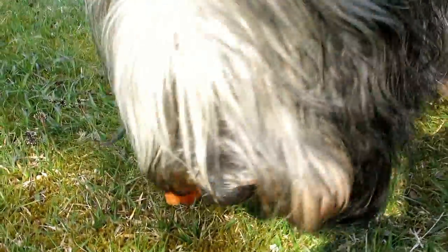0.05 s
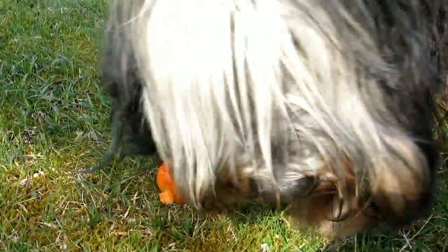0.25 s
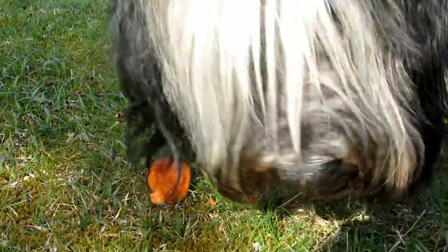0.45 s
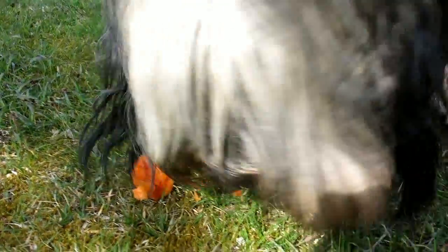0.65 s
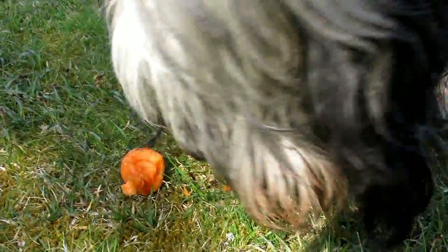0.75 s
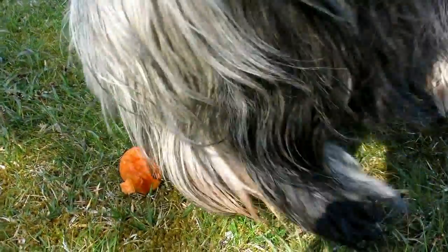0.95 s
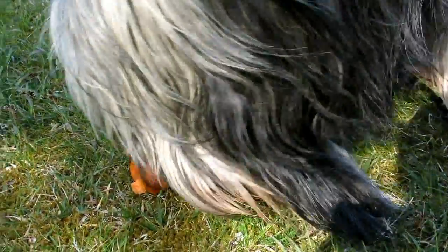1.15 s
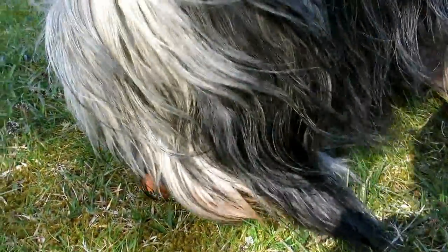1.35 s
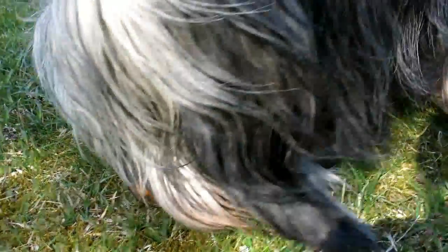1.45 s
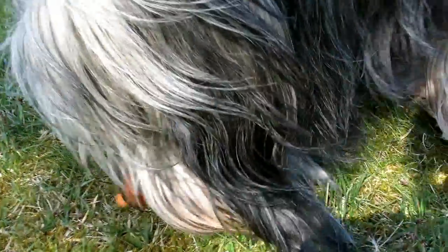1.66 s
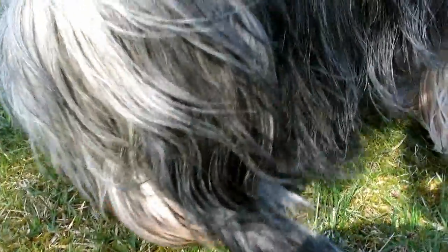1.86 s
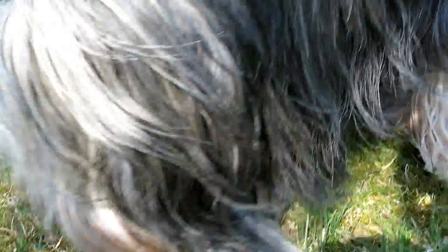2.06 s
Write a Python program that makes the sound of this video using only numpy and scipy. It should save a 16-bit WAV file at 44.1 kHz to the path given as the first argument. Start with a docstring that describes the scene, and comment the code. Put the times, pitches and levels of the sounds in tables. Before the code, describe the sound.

A dog crunches a raw carrot very close to the microphone outdoors. From 0.05 to 0.95 s, dense brittle cracks, tooth knocks, squelches and low jaw thuds, strongest around 0.5, 0.67 and 0.84. Wet smacks follow near 1.0 and 1.2, a duller crunch at 1.3, then fur swishing through grass around 1.5 to 1.7. Birds chirp at 0.4, 1.1 and 1.8, with falling whistles at 1.5 and 1.64.

```python
"""A shaggy dog bites a raw carrot close by, over a soft outdoor hush, a low rub and a fine rustle that last throughout.
Jaw thuds are brief low tones; pulp squelches in small pops; tooth knocks and lip smacks ring briefly.
The carrot splits in runs of tiny fractures that ring in the mouth and in the breaking flesh.
Farther off, birds chirp and whistle as gliding tones with diffuse tails.
Grass ticks and fur swishes are shaped noise and random clicks."""
import sys
import numpy as np
from scipy import signal
from scipy.fft import rfft, irfft
from scipy.io import wavfile
from scipy.ndimage import uniform_filter1d

SR = 44100
rng = np.random.default_rng(int(sys.argv[2]) if len(sys.argv) > 2 else 0)


def wav_record(signal):
    """Record a signal, one row per channel, as 16-bit PCM in the file named by sys.argv[1]."""
    frames = np.transpose(np.atleast_2d(signal))
    bounded = np.clip(frames, -1, 1)
    # unit amplitude maps onto the largest positive 16-bit level
    quanta = np.round(bounded * 32767).astype(np.int16)
    wavfile.write(sys.argv[1], SR, quanta)


N = 92610  # samples in the scene
SPAN_S = 0.008  # short sounds take their level as the rms (average strength) over this span


def from_db(db):
    """Turn decibels into a gain."""
    return 10 ** (np.asarray(db) / 20)


def span_gain(db):
    """Gain that brings a sound of energy 1 to this rms level over the short span."""
    return from_db(db) * np.sqrt(SPAN_S * SR)


def rms_one(x):
    """Scale to rms 1."""
    return x / np.sqrt(np.mean(x ** 2) + 1e-20)


def unit_energy(x):
    """Scale each channel to energy 1."""
    return x / np.sqrt(np.sum(x ** 2, axis=-1, keepdims=True) + 1e-20)


def curve(rows, t):
    """Join table rows by straight lines in time."""
    s, *columns = np.transpose(rows)
    return [np.interp(t, s, column) for column in columns]


def at_hz(points, hz):
    """Read a spectrum table along a logarithmic pitch axis."""
    f, value = np.transpose(points)
    return np.interp(np.log(hz + 1), np.log(f), value)


def add(out, s, sound):
    """Mix a sound in, starting at a given second."""
    i = int(np.clip(s * SR, 0, N - 1))
    out[..., i:i + sound.shape[-1]] += sound[..., :N - i]


def resonate(x, modes):
    """Ring side-by-side resonances (f/Hz, width/Hz, level/dB), flipping the sign of every second one."""
    out = 0
    for k, (hz, width, db) in enumerate(modes):
        r = np.exp(-np.pi * width / SR)  # a wider resonance dies sooner
        gain = (-1) ** k * from_db(db) * (1 - r * r) / 2
        feedback = [1, -2 * r * np.cos(2 * np.pi * hz / SR), r * r]
        out = out + gain * signal.lfilter([1, 0, -1], feedback, x)
    return out


def band(x, low_hz, high_hz):
    """Keep the sound between two pitches."""
    return signal.sosfilt(signal.butter(2, [low_hz, high_hz], "band", fs=SR, output="sos"), x)


def smooth_noise(shape, seconds):
    """Slowly wandering noise of rms 1: a running average over the given time."""
    return rms_one(uniform_filter1d(rng.standard_normal(shape), int(seconds * SR)))


# how alike left and right are at each pitch: (f/Hz, likeness from 0 to 1)
LIKENESS = [(60, 1), (150, 0.99), (300, 0.93), (700, 0.05), (2000, 0.12), (5000, 0.23), (14000, 0.05)]


def coloured(pair, colour):
    """Two unrelated signals become stereo with a given spectrum, at rms 1."""
    hz = np.arange(N // 2 + 1) * SR / N
    mid, side = rfft(pair) * from_db(at_hz(colour, hz))
    alike = np.clip(at_hz(LIKENESS, hz), -1, 1)
    shared = np.sqrt(1 + alike) * mid
    opposed = np.sqrt(1 - alike) * side * [[1], [-1]]
    return rms_one(irfft(shared + opposed, N))


def scatter(x, t60):
    """Diffuse reflections, different in each ear, that fall by 60 dB in t60 seconds."""
    t = np.arange(int(t60 * SR)) / SR
    tail = unit_energy(rng.standard_normal((2, len(t))) * from_db(-60 * t / t60))
    return signal.fftconvolve(x, tail, axes=-1)[:, :N]


PORT_LAG_S, PORT_CORNER_HZ = 0.000092, 3170  # the lag shrinks at higher pitches, halved at the corner
# colour of the right microphone port: (f/Hz, level/dB)
RIGHT_PORT = [(300, -0.5), (5000, -1), (9500, 2.5), (13000, -3.5)]


def ports(x):
    """The sound reaches the right microphone port a little later and slightly coloured."""
    hz = np.arange(N // 2 + 1) * SR / N
    lag = np.exp(-2j * np.pi * PORT_LAG_S * hz / (1 + hz / PORT_CORNER_HZ))
    right = rfft(x[1]) * from_db(at_hz(RIGHT_PORT, hz)) * lag
    return np.array([x[0], irfft(right, N)])


HUSH_DB = -47.5  # overall rms
# relative colour of the outdoor hush: (f/Hz, level/dB per Hz)
HUSH = [(18, -56), (30, -52), (69, 8), (108, -6.5), (177, -4.5), (369, -20), (639, -8.5), (767, -12),
        (970, -8.5), (2990, -25), (5040, -27), (12300, -33.5), (15500, -57)]


def hush():
    """Steady noise with the soft colour of outdoors."""
    return from_db(HUSH_DB) * coloured(rng.standard_normal((2, N)), HUSH)


RUSTLE_DB = 2  # added to every rustle level
GRAINS_PER_S, GRAIN_SPREAD_DB = 2600, -0.5
CLUMP_DB, CLUMP_S = 3.5, 0.0072
# fine crumbling of pulp and crackle of grass: (t/s, level/dB)
RUSTLE = [(0, -43), (.04, -55.5), (.08, -44), (.17, -51.5), (.22, -44), (.28, -38.5), (.34, -52),
          (.45, -45.5), (.49, -51), (.53, -41.5), (.62, -52.5), (.68, -47), (.77, -56), (.84, -42),
          (.91, -57), (.98, -45.5), (1.05, -57), (1.12, -46), (1.27, -61), (1.33, -48.5), (1.42, -65),
          (1.5, -52), (1.6, -54), (1.7, -56), (1.78, -55), (2.1, -62.5)]
# its relative colour: (f/Hz, level/dB)
RUSTLE_COLOUR = [(300, -5), (600, 3), (800, -6.5), (1150, 4), (2100, 0.5), (3200, -6.5), (4600, -6),
                 (7000, -13), (10500, -15.5), (15500, -17)]


def rustle():
    """Dense tiny clicks of uneven size, coming in clumps."""
    db, = curve(RUSTLE, np.arange(N) / SR)
    clump_db = CLUMP_DB * np.clip(smooth_noise(N, CLUMP_S), -2, 2)
    size_db = GRAIN_SPREAD_DB * np.minimum(rng.exponential(1, N), 2)
    grains = (rng.random(N) < GRAINS_PER_S / SR) * from_db(size_db + clump_db)
    clicks = grains * rng.uniform(-1.15, 1, (2, N))
    return from_db(db + RUSTLE_DB) * coloured(clicks, RUSTLE_COLOUR)


RUB_DB = 1.5  # added to every rub level
# dull rubbing of the muzzle over the ground: (t/s, level/dB)
RUB = [(0.0, -53), (0.05, -43), (0.47, -36.5), (0.5, -45), (0.73, -52), (0.84, -28.5), (0.93, -43),
       (1.09, -40.5), (1.13, -52), (1.37, -41.5), (1.63, -58), (1.69, -38.5), (1.77, -65.5), (1.84, -33.5),
       (1.89, -50.5), (2.1, -48)]
# its relative colour: (f/Hz, level/dB)
RUB_COLOUR = [(30, -36), (50, -44), (75, -2.5), (110, 6.5), (170, -8), (300, -7.5), (500, -14),
              (900, -42.5)]


def rubbing():
    """Low rumble, noise that swells and sinks as the muzzle moves about."""
    db, = curve(RUB, np.arange(N) / SR)
    return from_db(db + RUB_DB) * coloured(rng.standard_normal((2, N)), RUB_COLOUR)


THUD_DB, THUD_CYCLES = 1, 0.56  # added to every thud level; half length in cycles
# dull thuds of jaw and muzzle: (t/s, level/dB, f/Hz)
THUDS = [(0.056, -31, 133), (0.16, -26, 150), (0.176, -21.5, 115), (0.199, -29, 97), (0.225, -22.5, 187),
         (0.254, -26.5, 120), (0.286, -25.5, 124), (0.304, -29, 116), (0.323, -26, 200), (0.339, -32, 129),
         (0.371, -23, 108), (0.394, -25, 115), (0.408, -20, 160), (0.433, -27, 142), (0.454, -19.5, 132),
         (0.465, -21, 218), (0.489, -27, 145), (0.534, -28.5, 154), (0.565, -32, 191), (0.654, -22.5, 240),
         (0.781, -28.5, 188), (0.793, -20, 171), (0.806, -20, 187), (0.823, -22.5, 208), (0.838, -16, 151),
         (0.855, -25, 134), (0.882, -22, 225), (0.892, -23, 145), (0.953, -28.5, 170), (0.989, -28.5, 167),
         (1.043, -18, 171), (1.086, -21.5, 164), (1.185, -30.5, 134), (1.266, -32, 100), (1.29, -28.5, 140),
         (1.348, -27, 145), (1.368, -24.5, 161.4), (1.458, -24.5, 142), (1.501, -31, 198),
         (1.689, -24, 139.5), (1.831, -23.5, 132), (1.839, -24, 139), (1.85, -23.5, 124),
         (2.032, -29.5, 116)]


def thuds():
    """Each soft contact swells and dies within about two cycles."""
    out, t = np.zeros(N), np.arange(-1024, 1024) / SR
    for s, db, hz in THUDS:
        swell = np.exp(-(t * hz / THUD_CYCLES) ** 2)
        add(out, s + t[0], from_db(db + THUD_DB) * swell * np.sin(2 * np.pi * hz * t))
    return out


SQUELCH_POPS_PER_S, SQUELCH_WIDTH = 1100, 0.31  # width as a share of the pitch
# soft pulp is mashed between the teeth: (middle t/s, level/dB, half length/s, cavity f/Hz)
SQUELCHES = [(0.083, -43.5, 0.027, 426), (0.304, -46.5, 0.018, 536), (0.46, -41.5, 0.0083, 655),
             (1.118, -41.5, 0.0094, 1510), (1.333, -56, 0.011, 660), (1.678, -43, 0.0092, 900)]


def squelches():
    """Swells of small wet pops that ring in the cheek's cavity."""
    out, t = np.zeros(N), np.arange(N) / SR
    for s, db, half, hz in SQUELCHES:
        pops = (rng.random(N) < SQUELCH_POPS_PER_S / SR) * rng.uniform(-1.3, 1, N)
        cavity = band(resonate(pops, [(hz, SQUELCH_WIDTH * hz, 0)]), hz / 2, hz * 2)
        out += from_db(db) * np.exp(-((t - s) / half) ** 2) * rms_one(cavity)
    return out


KNOCK_DB, KNOCK_WIDTH = 1, 0.72  # added to every knock level; width as a share of the pitch
# teeth knock through the pulp, each a single hard pulse: (t/s, level/dB, f/Hz)
KNOCKS = [(0.0636, -48.5, 905), (0.074, -41.5, 650), (0.078, -46.5, 610), (0.1113, -44.5, 790),
          (0.2403, -37.5, 1020), (0.2965, -42, 450), (0.3172, -45, 475), (0.4595, -36.5, 740),
          (1.315, -54, 726), (1.3199, -35.5, 400), (1.3257, -45, 610), (1.344, -43, 600),
          (1.3596, -45, 436), (1.515, -48.5, 380)]


def knocks():
    """A tooth breaks through and stops: one sharp front, damped within a cycle or two."""
    out, click = np.zeros(N), signal.unit_impulse(1024)
    for s, db, hz in KNOCKS:
        pulse = resonate(click, [(hz, KNOCK_WIDTH * hz, 0)])
        add(out, s, span_gain(db + KNOCK_DB) * unit_energy(band(pulse, 180, 1670)))
    return out


FRACTURES_PER_S, FRACTURE_SIZE, FRACTURE_SPREAD_DB = 1800, 0.5, 4.5
BUILD_SHARE, BUILD_DB = 1.4, -11  # build-up time as a multiple of the crack's length, and its level
MOUTH_LEAK_DB, FLESH_SPREAD = -14, 0.11  # click that bypasses the mouth's ring; pitch spread between pieces
SNAP_DB, SIZZLE_DB = -6.5, 0.5  # added to every snap and sizzle level
# the carrot cracks: (t/s, mouth ring level/dB, snap level/dB, sizzle level/dB, mouth f/Hz,
# length/s, treble tilt to the left/dB)
CRACKS = [(0.075, -59, -40, -55, 1350, 0.00089, -1), (0.086, -42, -40.5, -51.5, 800, 0.0024, -4),
          (0.109, -37, -48, -67, 1710, 0.0032, -3), (0.2076, -34, -62, -44, 1860, 0.0016, 1),
          (0.231, -33.5, -46, -43.5, 1170, 0.0068, 3), (0.2388, -37, -50, -49, 1600, 0.00036, 8),
          (0.248, -36.5, -38, -47, 1100, 0.022, -1), (0.271, -35.5, -55, -50, 1720, 0.0064, 9),
          (0.2818, -36.5, -45, -48, 2270, 0.00088, -2), (0.3166, -40.5, -41.5, -47.5, 1530, 0.00063, -2),
          (0.3775, -34, -35, -40, 1140, 0.0032, 7), (0.383, -32, -43.5, -57, 1210, 0.0014, -17),
          (0.3997, -46, -34, -51, 1300, 0.0013, 1), (0.4244, -44, -37, -49, 1210, 0.0015, 5),
          (0.431, -37.5, -41, -55, 1140, 0.006, -2), (0.4484, -32, -45, -56, 1820, 0.0025, -4),
          (0.4567, -35.5, -46, -57, 1450, 0.0019, 6), (0.519, -31.5, -34.5, -27.5, 1180, 0.0028, 4),
          (0.523, -34.5, -35, -58, 1240, 0.0073, -8), (0.546, -42.5, -45, -44.5, 1680, 0.0033, 8),
          (0.6506, -42, -47, -60, 1500, 0.0006, -8), (0.662, -36.5, -44, -43, 1130, 0.0097, 7),
          (0.674, -32, -29, -36.5, 985, 0.0026, 2.5), (0.711, -76, -57, -50.5, 1260, 0.0007, 13),
          (0.721, -41, -49, -57, 1140, 0.0048, -6), (0.736, -39, -49, -60, 1490, 0.0052, 5),
          (0.8336, -35, -33, -46.5, 1300, 0.0012, 6), (0.8379, -38, -45, -42.5, 1120, 0.0036, 12),
          (0.8443, -30.5, -48.5, -60, 1130, 0.0004, -8), (0.8493, -40, -50, -65, 1130, 0.00092, -2),
          (0.955, -37, -42.5, -51.5, 1460, 0.0045, 4), (1.313, -48, -54, -61, 2300, 0.00031, -2),
          (1.32, -57, -48, -44.5, 1000, 0.016, 2)]
# mouth resonances: (multiple of the mouth pitch, width as a share of that pitch, level/dB)
MOUTH = [(0.602, 0.58, -7), (1, 0.22, 7), (1.42, 0.17, -2.5), (2.0, 0.81, -4.5)]
# resonances of the breaking flesh, lower and upper, before the spread: (f/Hz, width/Hz, level/dB)
SNAP = [(4130, 1270, -4.5), (5000, 470, 3.5), (6430, 4800, -8)]
SIZZLE = [(9270, 2800, 6.5), (11020, 1530, 9.5), (13700, 1900, -3)]


def cracks():
    """Fractures build up to a break and die away, heard directly and through the mouth."""
    out, t = np.zeros((2, N)), np.arange(-400, 1648) / SR  # the break is at t = 0
    for s, mouth_db, snap_db, sizzle_db, hz, length, left_db in CRACKS:
        build = from_db(BUILD_DB) * np.exp(-np.abs(t) / (BUILD_SHARE * length))
        strain = np.where(t < 0, build, np.exp(-np.abs(t) / length))
        sign, size = rng.standard_normal((2, len(t)))
        fractures = (rng.random(len(t)) < FRACTURES_PER_S / SR) * np.sign(sign)
        fractures = fractures * from_db(FRACTURE_SPREAD_DB * size) * FRACTURE_SIZE * strain
        run = fractures - (t == 0)  # the break itself is one sure pulse

        ring = resonate(run, [(hz * k, hz * width, db) for k, width, db in MOUTH])
        mouth = band(ring - from_db(MOUTH_LEAK_DB) * run, 790, 2560)
        piece = np.exp(FLESH_SPREAD * rng.uniform(-1, 1))
        snap = band(resonate(run, [(f * piece, width, db) for f, width, db in SNAP]), 1600, 8200)
        sizzle = band(resonate(run, [(f * piece, width, db) for f, width, db in SIZZLE]), 7200, 19000)

        treble = span_gain(snap_db + SNAP_DB) * unit_energy(snap)
        treble = treble + span_gain(sizzle_db + SIZZLE_DB) * unit_energy(sizzle)
        tilt = from_db([[left_db / 2], [-left_db / 2]])
        add(out, s + t[0], span_gain(mouth_db) * unit_energy(mouth) + treble * tilt)
    return out


SMACK_DB, SMACK_OPEN_S = 6.5, 0.0017  # added to every smack level; time constant of opening
SMACK_CLICK_DB, SMACK_RISE_PER_S = -13, 0.9  # broad click as the seal parts; share the pitch rises
# wet smacks of lips and tongue: (t/s, level/dB, starting f/Hz, time to fall 60 dB/s,
# upper starting f/Hz, upper level/dB relative to the lower)
SMACKS = [(0.097, -45.5, 1500, 0.0031, 1910, 12), (0.119, -46.5, 633, 0.012, 1330, -22),
          (0.586, -48, 1170, 0.012, 1640, 0), (0.697, -52, 1160, 0.012, 1690, 20),
          (0.8, -38, 500, 0.0081, 1090, -14), (0.8553, -39.5, 967, 0.031, 1500, -15),
          (0.926, -46.5, 1010, 0.018, 1500, -14), (0.998, -36, 1210, 0.015, 1680, -2.5),
          (1.222, -41, 626, 0.013, 1370, 0.5), (1.411, -48, 770, 0.02, 1260, -14),
          (1.672, -48.5, 760, 0.013, 1200, -2), (2.054, -54, 620, 0.017, 1180, -14)]


def smacks():
    """A wet seal clicks open and the small cavity behind it rings, rising as it widens."""
    out, t = np.zeros(N), np.arange(2048) / SR
    for s, db, hz, t60, upper_hz, upper_db in SMACKS:
        turn = 2 * np.pi * (t + SMACK_RISE_PER_S * t ** 2 / 2)
        upper = from_db(upper_db - 15 * t / t60) * np.sin(upper_hz * turn)  # fades a little sooner
        ring = np.sin(hz * turn) + upper
        ring = ring * (1 - np.exp(-t / SMACK_OPEN_S)) * from_db(-60 * t / t60)
        click = band(rng.standard_normal(len(t)) * np.exp(-t / SMACK_OPEN_S), hz / 2, upper_hz * 2)
        smack = unit_energy(ring) + from_db(SMACK_CLICK_DB) * unit_energy(click)
        add(out, s, span_gain(db + SMACK_DB) * unit_energy(smack))
    return out


WAVER_SHARE, WAVER_DB, WAVER_S = 0.011, 2, 0.002  # pitch waver, level waver, smoothing time


def voice(rows):
    """A slightly wavering tone gliding through rows of (t/s, f/Hz, level/dB)."""
    hz, db = curve(rows, np.arange(int(rows[-1][0] * SR)) / SR)
    bend, flutter = smooth_noise((2, SR), WAVER_S)[:, :len(hz)]
    phase = 2 * np.pi * np.cumsum(hz * (1 + WAVER_SHARE * bend)) / SR
    return np.sqrt(2) * from_db(db + WAVER_DB * flutter) * np.sin(phase)


SIDEBAND_DB, OVERTONE_DB = -20, -31.5
# each voice within a chirp: (t/s, f/Hz, level/dB)
LOWER_VOICE = [(.008, 3550, -22), (.016, 3650, -10), (.032, 3800, -4), (.042, 4600, -2), (.049, 4930, 4),
               (.055, 4950, 4), (.062, 4830, -4), (.069, 4400, -16)]
UPPER_VOICE = [(0, 2500, -19), (.011, 4450, -3), (.019, 4580, -3), (.028, 4350, -12), (.036, 4300, -40),
               (.047, 5500, -28)]
# the upper voice's closing fall: (t/s, multiple of the last pitch, level/dB)
UPPER_END = [(0.051, 1.031, -8), (0.066, 0.992, -2.5), (0.067, 0.95, -6)]


def chirp(last_hz):
    """Two voices at once; their products add sidebands and overtones."""
    lower, upper = np.zeros((2, N))
    ending = [(at, k * last_hz, level) for at, k, level in UPPER_END]
    add(lower, 0, voice(LOWER_VOICE))
    add(upper, 0, voice(list(UPPER_VOICE) + ending))
    sidebands = from_db(SIDEBAND_DB) * lower * upper ** 2
    overtones = from_db(OVERTONE_DB) * (lower + upper) ** 2
    return lower + upper + band(sidebands + overtones, 4000, 14000)


GARDEN_T60_S = 0.37  # the garden's tail falls 60 dB in this time
CHIRP_S, BIRD_ECHO_S, BIRD_ECHO_DB, BIRD_WET_DB = 0.07, 0.097, -17, -8
# a bird's two-voiced chirps: (t/s, level/dB, last f/Hz of the upper voice before the
# closing multiples, level change over CHIRP_S/dB)
CHIRPS = [(0.41, -38, 5100, -7.5), (1.067, -40, 5350, 0), (1.831, -38.5, 5630, 1)]


def chirps():
    """Chirps, each followed by an echo and the garden's diffuse tail."""
    direct, swell = np.zeros(N), np.minimum(np.arange(N) / SR / CHIRP_S, 1)
    for s, db, last_hz, swell_db in CHIRPS:
        add(direct, s, from_db(db + swell_db * swell) * chirp(last_hz))
    song = direct.copy()
    add(song, BIRD_ECHO_S, from_db(BIRD_ECHO_DB) * direct)
    near = ports(np.array([song, song]))
    return near + from_db(BIRD_WET_DB) * scatter(near, GARDEN_T60_S)


TICK_S, TICK_LOW_HZ, TICK_HIGH_HZ = 0.0016, 3200, 13800
# dry grass blades tick under the muzzle: (t/s, level/dB)
TICKS = [(0.697, -53), (0.986, -48), (1.482, -61), (1.694, -54), (1.7075, -54), (1.717, -52), (1.748, -54)]


def ticks():
    """Short bright bursts as stiff blades spring back."""
    out, t = np.zeros(N), np.arange(1024) / SR
    for s, db in TICKS:
        burst = band(rng.standard_normal(len(t)) * np.exp(-t / TICK_S), TICK_LOW_HZ, TICK_HIGH_HZ)
        add(out, s, span_gain(db) * unit_energy(burst))
    return out


SWISH_GRAINS_PER_S = 5700
# fur brushes through the grass: (middle t/s, level/dB, half length/s)
SWISHES = [(1.107, -41.5, 0.013), (1.481, -41.5, 0.03), (1.648, -45.5, 0.11)]
# their relative colour: (f/Hz, level/dB)
SWISH_COLOUR = [(250, -3), (700, 0), (1200, -1), (2200, -4), (3300, -10), (4600, -12), (7000, -16),
                (10000, -16), (12500, -11), (15500, -21)]


def swishes():
    """Swells of long hair sliding over grass, blade after blade."""
    t = np.arange(N) / SR
    swell = sum(from_db(db) * np.exp(-((t - s) / half) ** 2) for s, db, half in SWISHES)
    blades = (rng.random(N) < SWISH_GRAINS_PER_S / SR) * rng.standard_normal((2, N))
    return swell * coloured(blades, SWISH_COLOUR)


WHISTLE_TOP_HZ, WHISTLE_END_HZ = 2646, 1500
WHISTLE_ECHO_S, WHISTLE_WET_DB, WHISTLE_FLUTTER_DB = 0.016, 1.5, 2
# another bird's falling whistles: (t/s, level/dB, length/s)
WHISTLES = [(1.5, -41, 0.033), (1.642, -39, .027)]


def whistles():
    """Falling tones of flickering level, with a slightly delayed diffuse tail."""
    far, late = np.zeros((2, 2, N))
    for s, db, length in WHISTLES:
        u = np.linspace(0, 1, int(length * SR))  # progress through the whistle
        hz = WHISTLE_TOP_HZ + (WHISTLE_END_HZ - WHISTLE_TOP_HZ) * u ** 1.594
        flutter = smooth_noise(SR, WAVER_S)[:len(u)]
        level = from_db(db + WHISTLE_FLUTTER_DB * flutter) * np.abs(np.sin(np.pi * u)) ** 0.5
        add(far, s, level * np.sin(2 * np.pi * np.cumsum(hz) / SR))
    add(late, WHISTLE_ECHO_S, band(far, 1700, 2920))
    return far + from_db(WHISTLE_WET_DB) * scatter(late, GARDEN_T60_S)


NEAR_WET_DB, NEAR_T60_S, FAR_WET_DB = -4, 0.045, -29  # reflections from the ground, then the garden


def scene():
    """The chewing, scattered by the ground and the garden, among birds and hush."""
    bites = ports(cracks() + knocks() + smacks() + squelches())
    near = from_db(NEAR_WET_DB) * scatter(bites, NEAR_T60_S)
    far = from_db(FAR_WET_DB) * scatter(bites, GARDEN_T60_S)
    jaw = thuds() * np.ones((2, 1))
    jaw = jaw * from_db([[-.5], [.5]]) + scatter(band(jaw, 288.5, 590), 0.03)  # a touch to the right
    grass = ports(rustle() + swishes() + ticks())
    return hush() + rubbing() + grass + jaw + bites + near + far + chirps() + whistles()


def record(dry):
    """The microphone loses the deep bass; the top is cut."""
    thin = signal.sosfilt(signal.butter(4, 45, "high", fs=SR, output="sos"), dry)
    return signal.sosfilt(signal.ellip(10, .1, 90, 15900, fs=SR, output="sos"), thin)


dry = scene()
out = record(dry)
wav_record(out)
```